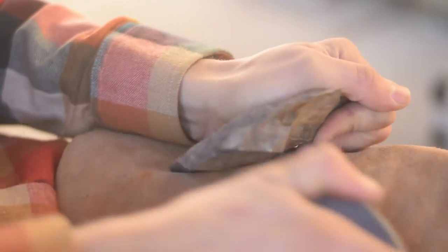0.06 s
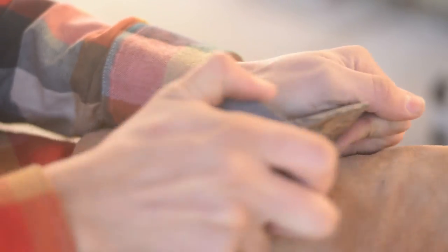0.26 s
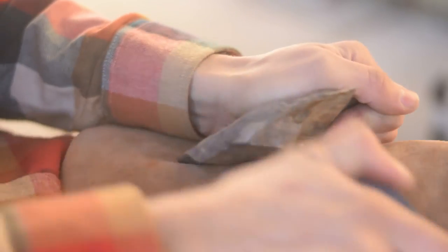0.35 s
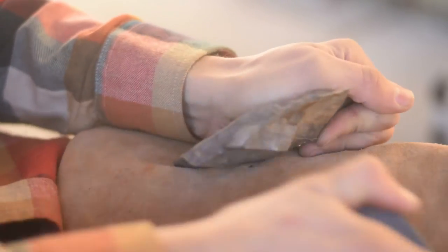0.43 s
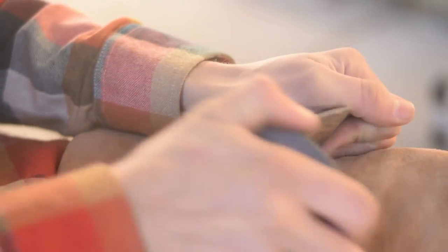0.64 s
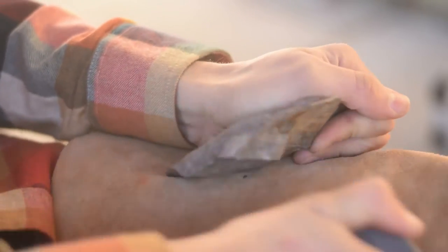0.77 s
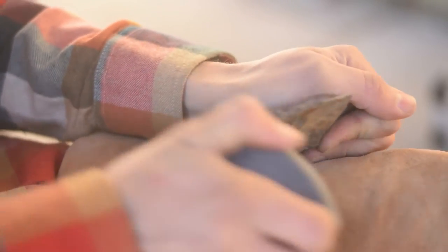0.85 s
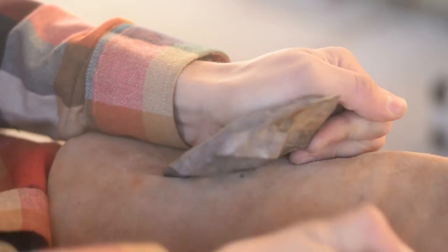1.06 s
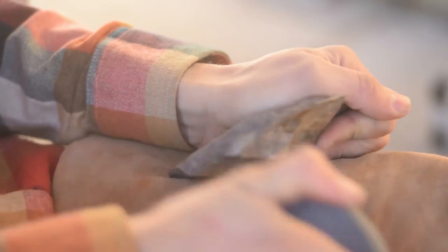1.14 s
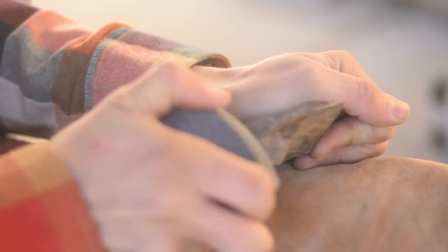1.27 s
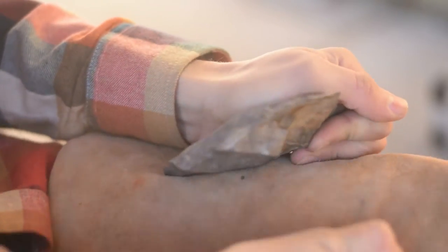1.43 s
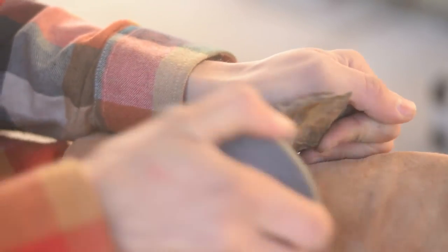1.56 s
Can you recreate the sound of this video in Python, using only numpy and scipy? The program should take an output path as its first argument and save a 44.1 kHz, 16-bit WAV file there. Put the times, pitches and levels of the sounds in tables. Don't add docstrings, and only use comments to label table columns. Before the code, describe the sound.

Stone scraping on stone: four quick dry rasps, each landing with a sharp, close clack.

```python
import sys
import numpy as np
from scipy import signal
from scipy.io import wavfile
from scipy.ndimage import uniform_filter1d

SR = 44100
rng = np.random.default_rng(int(sys.argv[2]) if len(sys.argv) > 2 else 0)


def dump_mix(stems):
    frames = np.atleast_2d(stems).T
    limited = np.clip(frames, -1, 1)
    pcm = np.round(limited * 32767).astype(np.int16)
    wavfile.write(sys.argv[1], SR, pcm)


def natural_amplitude(level_db):
    exponent = np.asarray(level_db, float) / 20
    return 10 ** exponent


N = 70560
LEAD_IN = 11025

# pitch_hz, level_db (per Hz)
ROOM_TONE = [(18, -43), (30, -37.5), (98, -6), (568, -14), (719, -22), (820, -17.5), (1040, -16.5),
             (3130, -20), (15900, -34.5)]
ROOM_TONE_DB, PATCHY_DB = -47.5, 1.5

# time_s, level_db
DRONE_LEVEL = [(0, -52), (.1, -43), (.2, -39.5), (.3, -61.5), (.55, -43.5), (.68, -60), (.8, -44),
               (.93, -39), (1.02, -40.5), (1.12, -49.5), (1.26, -40.5), (1.36, -52), (1.5, -48.5),
               (1.6, -43.5)]
DRONE_ORDERS = (1, 4 / 3, 5 / 3, 2, 3, 4, 5)
DRONE_ORDER_DB = (-1, -9.5, -14.5, -8, -13, -20, -23.5)
DRONE_HZ, DRONE_WAVER = 87, 0.012

# start_s, length_s, level_db
RUSTLES = [
    (0.059, 0.089, -91),
    (0.834, 0.066, -49),
    (1.146, 0.024, -49.5),
    (1.184, 0.061, -47.5),
    (1.55, 0.044, -51),
]
# lowest_hz, highest_hz
RUSTLE_BAND = (3500, 13000)

# pitch_hz, time_to_fall_60_db_s
ROOM_DECAY = [(250, 0.32), (660, 0.52), (1740, 0.41), (4590, 0.48), (8000, 0.36), (13000, .12)]
ROOM_DB = -22
DULL_HZ = 4000

# pitch_hz, width_hz, level_db
BODY_MODES = [(404, 255, -7), (566.6, 86, -5), (734, 55, -9), (961, 145, -7), (1204, 243, -4),
              (1491, 144, 0.5), (1777, 180, 5.5), (2116, 570, 2), (2458, 147, -2.5), (3148, 197, -1),
              (3420, 136, 0.5), (3558, 190, -3.5), (4630, 780, -14)]
# pitch_hz, width_hz, level_db
EDGE_MODES = [(5840, 2600, -9.5), (7150, 740, -1.5), (8016, 390, 0.5), (8360, 460, -2.5),
              (10660, 330, -13.5), (11100, 210, -14.5), (11940, 260, -9.5), (15000, 2500, -16)]
# pitch_hz, width_hz, level_db
TIP_MODES = [(4170, 1430, -10.5), (7460, 900, -17.5), (9700, 3600, -15.5), (12058, 125, -4.5),
             (12150, 420, -10.5), (13800, 2000, -21.5)]
BODY_DB, EDGE_DB = 1.5, 4
LOW_TOP_HZ, UPPER_FROM_HZ, TOP_FROM_HZ = 1300, 2900, 4000

# start_s, peak_db, pitch_hz
KNOCKS = [
    (.2188, 1, 1850),
    (.3133, -11, 2100),
    (.5810, -1, 1950),
    (.9504, 0, 1900),
    (1.3016, 1, 2000),
]
# multiple of the pitch, level_db
KNOCK_TONES = [(.72, -8), (1.25, -9), (1.72, -12), (2.3, -16)]
# delay_s, level_db
NEAR_ECHOES = [(.0031, -13.5), (.0038, -24.5), (.0046, -17.5), (.0056, -15), (.0068, -13.5), (.0085, -19)]
KNOCK_DB, KNOCK_S = 12, 0.001
KNOCK_TICK_DB, THUMP_DB, KNOCK_EDGE_DB = -7.5, -67, -5.5

# time_s, pressure_db, sharpness_db
STROKES = [
    [(0.311, -12, -12), (0.349, -12, -13), (0.384, -23.5, -17)],
    [(0.638, -33, -30), (0.646, -20, -4.5), (0.656, -12, -34), (0.666, -19, -13.5), (0.708, -11, -17),
     (0.73, -23, -11)],
    [(0.975, -46, -20), (0.981, -39, 5), (0.991, -13.5, -35), (0.999, -15, -17), (1.017, -8, -16),
     (1.055, -15.5, -18.5), (1.066, -18.5, -8.5)],
    [(1.322, -44, -1), (1.328, -28.5, -9), (1.358, -10, -16), (1.402, -13, -20), (1.424, -20, -24)],
]
# time_s, pressure_db, sharpness_db
SKIDS = [
    [(.25, -47, -16), (.258, -21, -5), (.266, -37, -5), (.3, -48.5, -13), (.31, -36.5, -7)],
    [(.583, -7.5, -19), (.595, -19.5, -12), (.606, -21, -20), (.614, -34, -32), (.618, -44, -5)],
]
# low_db, upper_db
GRIPS = [(-0.5, -3), (1.5, 2), (2, -0.5), (-1, -2.5), (-0.5, -3), (3, 3), (5, -12)]
EARLIER_END_S, EARLIER_DB = -0.0407, 3
LIFT_S = 0.0022
BRIGHTEN_DB = 10.5
# end_s, level_db, build_up_s
SLIPS = [
    (0.381, -14.5, 0.0084),
    (0.73, -13.5, 0.024),
    (1.0651, -10, 0.0096),
    (1.4213, -12, 0.0073),
]
# start_s, peak_db, sharpness_db
CATCHES = [(.2570, -4.5, -10.5), (0.28, -16.5, -11), (0.2893, -36, -1), (0.305, -32, -7),
           (0.313, -9.5, -7.5), (0.3464, -6, -12), (0.5869, -6.5, -7), (.597, -13, -14), (.602, -6, -26),
           (.608, -13, -22), (0.647, -6, -29), (0.6573, -4.5, -17), (.991, -6, -9), (0.998, -18, 6.5),
           (1.306, -0.5, -39), (1.309, 3, -18), (1.373, -4.5, -15), (1.390, -5, -23)]
CATCH_DB, CATCH_S = 12.5, 0.00047
GRIT_PER_S, GRIT_SPREAD_DB = 2500, 3
JUDDER_DB, JUDDER_S = -0.5, 0.001
LOW_CUT_HZ = 300


def evened(x):
    return x / np.sqrt(np.mean(x ** 2) + 1e-20)


def read(points, hz):
    f, value = np.transpose(points)
    return np.interp(np.log(hz + 1), np.log(f + 1), value)


def add(mix, start_s, sound):
    part = mix[round(start_s * SR) + LEAD_IN:][:len(sound)]
    part += sound[:len(part)]


def air():
    frames, hz = N // 256 + 5, np.fft.rfftfreq(1024, 1 / SR)
    real, imaginary, patches = rng.standard_normal((frames, 513, 3)).T
    patches = uniform_filter1d(patches, 30, 0)
    patches = evened(uniform_filter1d(patches, 10, 1))
    shape = natural_amplitude(read(ROOM_TONE, hz))
    spectrum = (real + 1j * imaginary) * shape[:, None] * natural_amplitude(PATCHY_DB * patches)
    hiss = signal.istft(spectrum, nperseg=1024, noverlap=768)[1][:N]
    low_share = np.sum(shape ** 2) / np.sum(shape[hz > 300] ** 2)
    return natural_amplitude(ROOM_TONE_DB) * np.sqrt(low_share) * evened(hiss)


def drone():
    t = np.arange(N) / SR
    waver = uniform_filter1d(rng.standard_normal(N), 3000)
    waver = evened(uniform_filter1d(waver, 3000))
    turns = np.cumsum(DRONE_HZ * (1 + DRONE_WAVER * waver)) / SR
    tones = np.zeros(N)
    for order, db in zip(DRONE_ORDERS, DRONE_ORDER_DB):
        tones += natural_amplitude(db) * np.sin(2 * np.pi * (order * turns + rng.random()))
    return np.sqrt(2) * natural_amplitude(np.interp(t, *np.transpose(DRONE_LEVEL))) * tones


def rustle():
    t = np.arange(N) / SR
    swell = np.zeros(N)
    for start_s, length_s, db in RUSTLES:
        half = length_s / 2
        swell += natural_amplitude(db) * np.exp(-((t - start_s - half) / half) ** 2)
    band = signal.butter(2, RUSTLE_BAND, "bandpass", fs=SR, output="sos")
    return swell * evened(signal.sosfilt(band, rng.standard_normal(N)))


def dull(x):
    return signal.sosfilt(signal.butter(3, DULL_HZ, fs=SR, output="sos"), x)


def room(x):
    echoes = np.zeros(SR // 2)
    at = np.arange(300, SR // 2 - 20, 20)
    echoes[at + rng.integers(0, 20, len(at))] = rng.choice([-1., 1.], len(at))
    hz, t, spectrum = signal.stft(echoes, SR, nperseg=256)
    fading = natural_amplitude(-60 * t / read(ROOM_DECAY, hz)[:, None])
    tail = signal.istft(spectrum * fading, SR, nperseg=256)[1]
    return signal.fftconvolve(x, tail / np.linalg.norm(tail))[:len(x)]


def ring(modes, from_hz=0, to_hz=np.inf):
    t = np.arange(3000) / SR
    each = []
    for k, (hz, width, db) in enumerate(modes):
        fading = np.sqrt(width) * np.exp(-np.pi * width * t)
        each.append((-1) ** k * natural_amplitude(db) * fading * np.sin(2 * np.pi * hz * t))
    each, hz = np.array(each), np.transpose(modes)[0]
    chosen = (hz >= from_hz) & (hz < to_hz)
    return each[chosen].sum(0) / np.linalg.norm(each.sum(0))


def knocks():
    out, t = np.zeros(N + LEAD_IN), np.arange(3000) / SR
    for start_s, db, hz in KNOCKS:
        tones = sum(natural_amplitude(d) * np.sin(2 * np.pi * k * hz * t) for k, d in [(1, 0), *KNOCK_TONES])
        blow = np.exp(-(t / KNOCK_S) ** 2) * tones
        blow += natural_amplitude(THUMP_DB) * np.exp(-t / 0.0005)
        blow += natural_amplitude(KNOCK_TICK_DB) * ring(BODY_MODES)
        with_edge = blow + natural_amplitude(KNOCK_EDGE_DB) * ring(EDGE_MODES)
        add(out, start_s, natural_amplitude(db + KNOCK_DB) * with_edge)
        for delay_s, echo_db in NEAR_ECHOES:
            echo_s = start_s + delay_s * rng.uniform(0.9, 1.2)
            add(out, echo_s, -natural_amplitude(db + KNOCK_DB + echo_db) * dull(blow))
    return out


def grit(count):
    size_db = GRIT_SPREAD_DB * np.minimum(rng.exponential(1, count), 4)
    size = natural_amplitude(size_db) * rng.choice([-1., 1.], count)
    judder = evened(uniform_filter1d(rng.standard_normal(count), max(round(JUDDER_S * SR), 2)))
    happens = rng.random(count) < GRIT_PER_S / SR
    return evened(size * happens * natural_amplitude(JUDDER_DB * judder))


def catches(body, edge):
    t = np.arange(400) / SR
    bursts = rng.standard_normal((len(CATCHES), 400)) * np.exp(-t / CATCH_S)
    for (start_s, db, sharp_db), burst in zip(CATCHES, bursts):
        add(body, start_s, natural_amplitude(db + CATCH_DB) * (t == 0))
        add(edge, start_s, natural_amplitude(db + CATCH_DB + sharp_db) * evened(burst) / 20)


def scrape():
    t = (np.arange(N + LEAD_IN) - LEAD_IN) / SR
    body, edge, tip, low_db, upper_db, along = np.zeros((6, N + LEAD_IN))
    last = np.array(STROKES[-1])
    earlier = last + [EARLIER_END_S - last[-1, 0], EARLIER_DB, 0]
    for rows, grip in zip([earlier, *STROKES, *SKIDS], GRIPS):
        s, press_db, sharp_db = np.transpose(rows)
        landed = np.clip((t - s[0]) / LIFT_S, 0, 1)
        touch = landed * np.clip((s[-1] - t) / LIFT_S + 1, 0, 1)
        body += touch * natural_amplitude(np.interp(t, s, press_db))
        edge += touch * natural_amplitude(np.interp(t, s, press_db + sharp_db))
        low_db[touch > 0], upper_db[touch > 0] = grip
        progress = np.clip((t - s[0]) / (s[-1] - s[0]), 0, 1)
        along += (touch > 0) * (progress - 0.5)
    for end_s, db, build_s in [(EARLIER_END_S, *SLIPS[-1][1:]), *SLIPS]:
        tip += natural_amplitude(db) * np.exp(np.minimum(t - end_s, 0) / build_s) * (t < end_s)

    clicks, fine = grit(N + LEAD_IN), grit(N + LEAD_IN)
    body, edge, tip = body * clicks, edge * evened(clicks + fine), tip * fine
    catches(body, edge)

    low = ring(BODY_MODES, 0, LOW_TOP_HZ)
    upper = ring(BODY_MODES, UPPER_FROM_HZ, TOP_FROM_HZ)
    top = ring(BODY_MODES, TOP_FROM_HZ)
    middle = ring(BODY_MODES) - low - upper - top
    parts = [
        (body * natural_amplitude(low_db), low),
        (body, middle),
        (body * natural_amplitude(upper_db), upper),
        (body * natural_amplitude(BRIGHTEN_DB * along), top),
        (edge * natural_amplitude(EDGE_DB - BODY_DB), ring(EDGE_MODES)),
        (tip / natural_amplitude(BODY_DB), ring(TIP_MODES)),
    ]
    return natural_amplitude(BODY_DB) * sum(signal.oaconvolve(push, modes)[:N + LEAD_IN] for push, modes in parts)


def scene():
    low_cut = signal.butter(2, LOW_CUT_HZ, "highpass", fs=SR, output="sos")
    rasp = signal.sosfilt(low_cut, scrape())
    blows = knocks()
    echo = natural_amplitude(ROOM_DB) * room(rasp + dull(blows))
    stones = (rasp + blows + echo)[LEAD_IN:]
    return (stones + air() + drone() + rustle())[None]


def roll_off(x):
    return signal.sosfilt(signal.butter(12, 16080, fs=SR, output="sos"), x)


def record(dry):
    duck_from_db, duck_share, recover_db_per_s = -11, 0.56, 177
    power_db = 10 * np.log10(abs(uniform_filter1d(dry[0] ** 2, 100, origin=49)) + 1e-12)
    fall = np.arange(N) * recover_db_per_s / SR
    held_db = np.maximum.accumulate(power_db + fall) - fall
    over_db = np.maximum(held_db - duck_from_db, 0)
    ducked = dry / natural_amplitude(duck_share * uniform_filter1d(over_db, size=160, origin=79))
    return roll_off(np.clip(ducked, -1, 1))


dry = scene()
out = record(dry)
dump_mix(out)
```